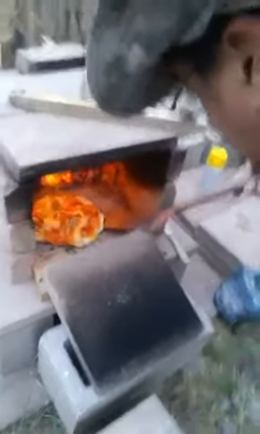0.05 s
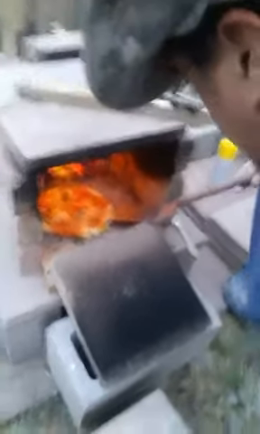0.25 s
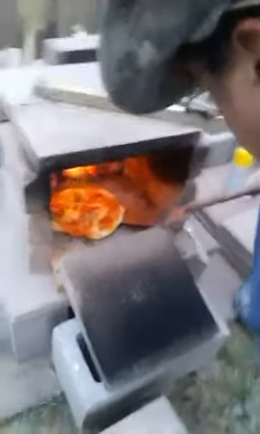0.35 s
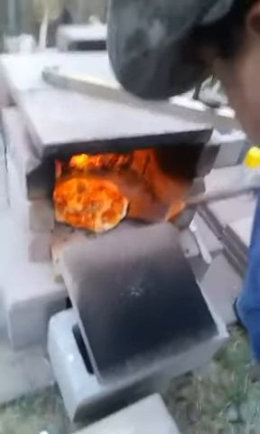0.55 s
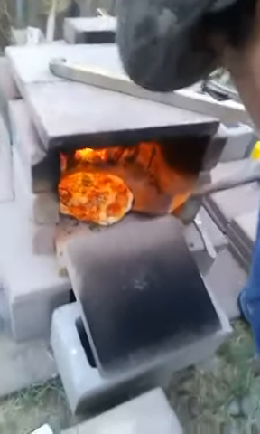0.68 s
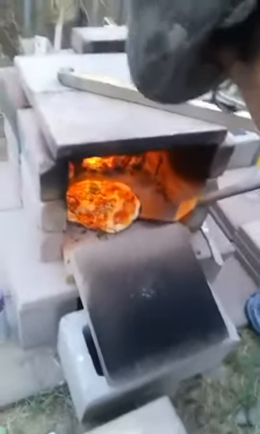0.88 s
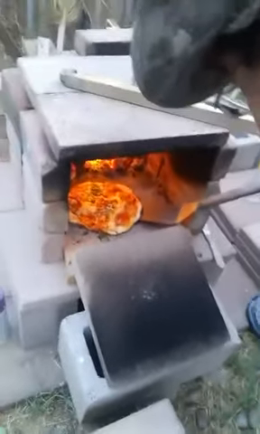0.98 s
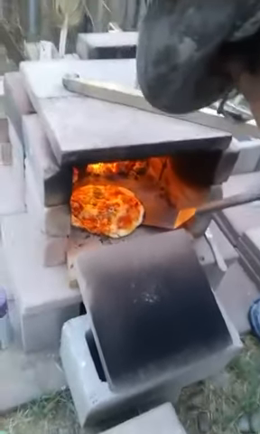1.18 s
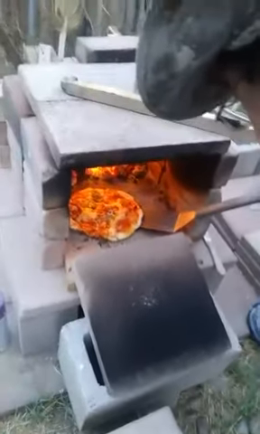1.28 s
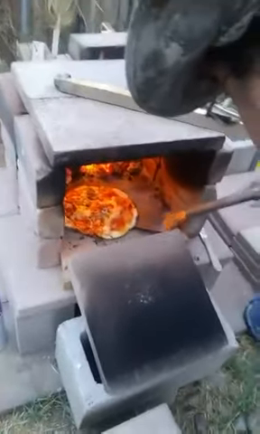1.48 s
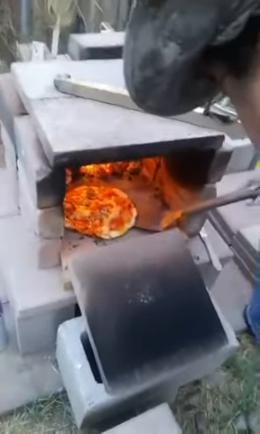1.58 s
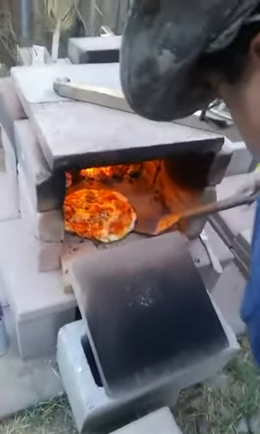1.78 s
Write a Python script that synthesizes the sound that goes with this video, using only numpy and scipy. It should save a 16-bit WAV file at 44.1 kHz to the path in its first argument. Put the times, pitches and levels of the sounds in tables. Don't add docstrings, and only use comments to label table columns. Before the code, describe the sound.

A thin metal peel scrapes in short gritty strokes over a brick oven floor, wind buffeting

```python
import sys
import numpy as np
from scipy import signal
from scipy.fft import rfft, irfft, next_fast_len
from scipy.io import wavfile
from scipy.ndimage import uniform_filter1d

SR = 44100
rng = np.random.default_rng(int(sys.argv[2]) if len(sys.argv) > 2 else 0)


def attenuation_scalar(level_db):
    decades = np.asarray(level_db, float) / 20
    return 10 ** decades


def generate_wav(sig):
    pcm = np.round(np.clip(np.atleast_2d(sig).T, -1, 1) * 32767).astype(np.int16)
    wavfile.write(sys.argv[1], SR, pcm)


N = 81585

# start_s, length_s, start_level_db, end_level_db, handle_weight_db
STROKES = [(0, 0.025, -37.5, -52.5, 4.5), (0.019, 0.087, -48, -55.5, -6), (.091, 0.011, -46, -45, -10),
           (0.103, 0.12, -36, -35.5, -6), (0.183, 0.024, -27.5, -38, 0), (0.225, .025, -40.5, -39.5, 0),
           (0.259, 0.091, -36.5, -29, -11), (0.325, 0.046, -31, -32.5, -16.5),
           (0.377, 0.044, -31, -28, -7.5), (0.423, 0.073, -39.5, -54.5, -1),
           (0.4907, 0.049, -36.5, -30, -11.5), (0.547, 0.1, -36.5, -48, -11), (0.622, 0.024, -33, -37.5, 2),
           (0.646, 0.078, -51.5, -48.5, -6), (0.734, .012, -54, -52, -20),
           (0.749, 0.09, -39.5, -42.5, -14.5), (0.802, 0.032, -32.5, -40.5, -40),
           (0.869, 0.044, -45, -54, -9), (0.901, 0.016, -39, -48, -32), (0.933, 0.015, -48, -38.5, -3),
           (1.037, 0.1, -32, -38, -16.5), (1.104, 0.073, -48.5, -47, -9), (1.264, 0.0092, -38, -60.5, -18),
           (1.299, 0.042, -56.5, -43, -22), (1.442, 0.15, -41.5, -40, -55),
           (1.539, 0.039, -56.5, -37.5, -15), (1.595, 0.033, -33, -40, -15), (1.792, 0.0076, -54, -48, -38),
           (1.805, 0.064, -35.5, -39.5, -19.5)]
# start_s, level_db, handle_weight_db, brightness_db
CATCHES = [(0.193, -30, 16, -6), (0.206, -31, 12.5, -12.5), (0.371, -28.5, -5.5, -8), (0.349, -27, -9, 3),
           (0.493, -31, -29, 5), (.594, -43, -21, 6), (0.407, -37, -0.5, 0), (0.477, -36.5, -25, 5),
           (0.625, -34, 6, 1), (0.712, -43, -40, 11), (0.785, -32.5, -19, 5), (0.526, -35, -21, 1),
           (0.941, -27, -8.5, 11), (0.993, -51.5, 4, -1), (1.053, -33.5, -36, 26), (1.093, -21.5, -25, 5),
           (1.145, -32.5, -16, -15), (1.333, -47, -15, -14), (1.489, -30.5, -40, 5), (1.577, -46, -22, 0),
           (1.608, -27, -26, -2)]
# centre_s, length_s, pitch_hz, level_db
SINGS = [(0.13, 0.02, 12700, -63), (0.181, 0.019, 6830, -32), (0.332, 0.013, 6960, -30),
         (0.377, 0.019, 11670, -31), (0.413, 0.026, 9200, -36), (0.494, 0.024, 13000, -48),
         (0.531, 0.02, 13060, -33), (0.509, 0.08, 7150, -39), (.765, 0.042, 5530, -47),
         (.81, 0.032, 5460, -42.5), (0.908, 0.02, 5520, -48.5), (1.046, 0.012, 5620, -41.5),
         (1.084, 0.027, 12800, -49), (1.336, 0.008, 5480, -40.5), (1.576, 0.021, 7400, -45),
         (1.58, 0.015, 6500, -50)]
# start_s, pitch_hz, peak_db, t60_s
PINGS = [(.001, 1200, -46, 0.2), (.193, 1111, -23.5, 0.1), (0.194, 1340, -34, 0.1),
         (.2, 1650, -28.5, 0.091), (0.413, 1342, -29.5, 0.083), (1.295, 950, -50.5, 0.062),
         (0.406, 1139, -26, 0.068), (0.633, 343, -32, 0.067), (0.943, 1342, -30.5, 0.055),
         (1.148, 1465, -44.5, 0.076), (.63, 926, -40.5, 0.13)]
# time_s, level_db
FLATNESS = [(0, -6.5), (.1, -3), (.65, 2), (.74, -8.5), (.82, -10), (.87, -19), (1.0, -10), (1.05, -0.5),
            (1.3, -3.5), (1.6, -1), (1.85, 5.5)]
# frequency_hz, level_db (per Hz)
GRIT_COLOUR = [(880, -23), (1500, -45), (2340, -16), (4180, -3), (4690, -8), (5770, -1), (9370, -3.5),
               (13300, -6.5), (14500, -26.5)]
BLADE_HZ = [3080, 4270, 4945, 5410, 5940, 6525, 7000, 7400, 8100, 9160, 10300, 11800, 12200, 13000]
BLADE_LEVELS_DB = [8.5, -39, 5.5, 11.5, 10, 9, 10, 1.5, -23, 0, 4, 3.5, -22, -5]
# pitch_hz, level_db, t60_s
HANDLE_MODES = [(880, -44, 0.11), (1170, 11.5, 0.089), (1387, 15.5, 0.032), (1602, 8.5, 0.036),
                (1780, 8, 0.035), (2052, 12.5, 0.012), (2457, 4, 0.069), (2662, 4, 0.059),
                (3208, 14.5, 0.023), (3570, 13, 0.065), (5000, 5, 0.063)]
# centre_s, peak_db, eddy_hz, length_s
BUFFETS = [(0.111, -34.5, 71, 0.059), (0.132, -60, 68, 0.022), (0.212, -21, 79.5, 0.016),
           (0.23, -26, 62, 0.015), (0.396, -25, 64.5, 0.025), (0.418, -14.5, 89.3, 0.026),
           (0.454, -15, 108, 0.01), (0.495, -12, 69, 0.03), (0.549, -16.5, 65.5, 0.048),
           (0.584, -26, 60.7, 0.009), (.628, -19.5, 74, 0.065), (0.692, -12.5, 81, 0.017),
           (.722, -11.5, 106.5, .018), (0.743, -11, 114.3, 0.019), (0.756, -12.5, 63, 0.023),
           (0.774, -10.5, 122.5, 0.016), (0.799, -10.5, 76.6, 0.013), (0.821, -10.5, 95, 0.019),
           (0.84, -8, 98, 0.0095), (.878, -6, 73, 0.025), (.891, -3.5, 144, 0.0046),
           (0.904, -14.5, 63.7, 0.037), (0.968, -22.5, 74, 0.015), (1.057, -24.5, 70, 0.018),
           (1.115, -36, 74, 0.02), (1.196, -25.5, 124, 0.025), (1.208, -25, 74, 0.044),
           (1.307, -38.5, 66, 0.033), (1.666, -39, 56, 0.022), (1.82, -45, 73, 0.022),
           (0.868, -24.5, 242, 0.024), (0.725, -34, 265, 0.0065), (.772, -20.5, 182, 0.013),
           (0.951, -48, 337, 0.035), (0.344, -38.5, 55, 0.02), (1.018, -36.5, 80, 0.016),
           (1.8, -53, 51, 0.017), (0.524, -37, 144, 0.01)]
# frequency_hz, level_db (per Hz)
YARD_COLOUR = [(40, -0.5), (230, -5), (400, -11), (1200, -21), (1900, -30), (4400, -36), (6500, -27),
               (14000, -43)]

ATTACK_S, RELEASE_S, CATCH_S = 0.0028, 0.008, 0.0045
GRAINS_PER_S, GRAIN_DB = 7000, 2.5
CHATTER_DB, CHATTER_HZ, SPARK_DB = -0.5, 90.97, 2.2
FLAT_HZ, SPLIT_HZ = 4770, 8540
WANDER_DB, WANDER_HZ = 3, 25.09
SHEET_T60_S, BLADE_T60_S, SING_T60_S = 0.012, 0.042, 0.035
SHEET_DB, BLADE_DB, DRY_DB, HANDLE_DB = -3.5, -6.5, -6, -4
PING_RISE_S = 0.0014
OVEN_T60_S, OVEN_DB, OVEN_HZ = 0.33, -14, 7400
SKEW, GLIDE = 2.23, 0.26
CREST_DB, CREST_POWER = -8.5, 0.63
SWIRL_DB, SWIRL_HZ, SWIRL_POWER = -17, 160.4, 1.45
EDDY_DB, BREEZE_DB = -11, -49
POP_S, POP_DB, POP_HZ = 0.8895, -9.5, 490
CEILING, PORT_HZ = 0.99, 33.7
YARD_DB, RUMBLE_WANDER_DB, AIR_WANDER_DB = -52, 3, 1.2
TOP_HZ = 13950


def peel(t):
    low, high, handle_force = contact_force(t)
    grains = grit_grains()
    grit = level(colour(grains, GRIT_COLOUR))
    flat = attenuation_scalar(np.interp(t, *np.array(FLATNESS).T))
    edge = blade_edge(grit, low, high, flat)
    wander = [attenuation_scalar(WANDER_DB * walk(WANDER_HZ)) for _ in BLADE_HZ]
    blade = blade_ring(edge, grit, wander) + attenuation_scalar(DRY_DB) * edge
    handle = handle_ring(handle_force * grains, wander, flat)
    handle = handle / np.std(handle_ring(grains, wander, flat))
    return blade + attenuation_scalar(HANDLE_DB) * handle + singing(t, grains) + pings(t) + attenuation_scalar(OVEN_DB) * oven(blade)


def contact_force(t):
    low, high, handle = np.zeros((3, N))
    for start, length, start_db, end_db, weight_db in STROKES:
        u = t - start
        attack = np.clip(u / ATTACK_S + (start == 0), 0, 1)
        release = np.exp(-np.maximum(u - length, 0) / RELEASE_S)
        force = attack * attenuation_scalar(np.interp(u, [0, length], [start_db, end_db])) * release
        low += force ** 2
        high += force ** 2
        handle += (force * attenuation_scalar(weight_db)) ** 2
    for start, db, weight_db, bright_db in CATCHES:
        u = np.maximum(t - start, 0) / CATCH_S
        force = np.sqrt(u) * np.exp(-u ** 2 / 2) * 1.364 * attenuation_scalar(db)
        low += (force * attenuation_scalar(-bright_db / 2)) ** 2
        high += (force * attenuation_scalar(bright_db / 2)) ** 2
        handle += (force * attenuation_scalar(weight_db)) ** 2
    return np.sqrt([low, high, handle])


def grit_grains():
    chance = rng.random((3, N))
    hits = chance[0] < GRAINS_PER_S / SR
    sizes = attenuation_scalar(-GRAIN_DB * np.log(chance[2] + 1e-9))
    grains = hits * np.sign(chance[1] - 0.5) * sizes
    return level(grains * attenuation_scalar(CHATTER_DB * walk(CHATTER_HZ)))


def blade_edge(grit, low, high, flat):
    slow, below = split(grit, FLAT_HZ), split(grit, SPLIT_HZ)
    spark = attenuation_scalar(SPARK_DB * walk(CHATTER_HZ * 1.4))
    return low * (flat * slow + below - slow) + high * spark * (grit - below)


def blade_ring(edge, grit, wander):
    spots = rng.random((90, 2))

    def modes(x):
        sheet, strong = np.zeros((2, N))
        for k, (shift, decay) in enumerate(spots):
            hz = 2900 + 11000 * (k + shift) / len(spots)
            sheet += (-1) ** k * ring(x * wander[k % len(wander)], hz, SHEET_T60_S * (0.68 + decay))
        for hz, db, w in zip(BLADE_HZ, BLADE_LEVELS_DB, wander):
            strong += attenuation_scalar(db) * ring(x * w, hz, BLADE_T60_S)
        return sheet, strong

    sheet, strong = modes(edge)
    steady_sheet, steady_strong = modes(grit)
    return attenuation_scalar(SHEET_DB) * sheet / np.std(steady_sheet) + attenuation_scalar(BLADE_DB) * strong / np.std(steady_strong)


def handle_ring(x, wander, flat):
    out = np.zeros(N)
    for (hz, db, t60), w in zip(HANDLE_MODES, wander[::-1]):
        freedom = flat ** 2 if hz > 1500 else 1
        out += attenuation_scalar(db) * ring(x * w * freedom, hz, t60)
    return cut(out, 940, "high", order=6)


def singing(t, grains):
    out = np.zeros(N)
    for centre, length, hz, db in SINGS:
        swell = np.exp(-(2 * (t - centre) / length) ** 2)
        out += attenuation_scalar(db) * ring(grains * swell, hz, SING_T60_S)
    return out


def pings(t):
    out = np.zeros(N)
    for start, hz, db, t60 in PINGS:
        u = np.maximum(t - start, 0)
        out += attenuation_scalar(db - 60 * u / t60) * (1 - np.exp(-u / PING_RISE_S)) * np.sin(2 * np.pi * hz * u)
    return out


def oven(blade):
    hiss_colour = [(1500, -35), (OVEN_HZ / 2, -14), (5200, -4), (OVEN_HZ, 0), (10500, -5), (14000, -10)]
    hiss = level(colour(rng.standard_normal(N), hiss_colour))
    fade = attenuation_scalar(-120 * np.arange(int(0.6 * SR)) / SR / OVEN_T60_S)
    power = signal.fftconvolve(blade ** 2, fade / fade.sum())[:N]
    return hiss * np.sqrt(np.abs(power))


def wind(t):
    swing, gust = np.zeros((2, N))
    for (centre, db, hz, length), turn in zip(BUFFETS, rng.random(len(BUFFETS))):
        v = t - centre
        u = np.where(v < 0, SKEW, 1) * v / length
        swell = attenuation_scalar(db) * np.exp(-(1.72 * u) ** 2 / 2)
        phase = 2 * np.pi * (hz * v * (1 - GLIDE * np.tanh(u)) + (turn - 0.5) / 10)
        crest = swell * (swell * np.exp(-(v / length) ** 2)) ** CREST_POWER
        swing += swell * np.cos(phase) + attenuation_scalar(CREST_DB) * crest * np.cos(2 * phase)
        gust += swell
    noise = rng.standard_normal((2, N))
    swirl = cut(cut(noise[0], SWIRL_HZ * 1.275, "low", order=6), SWIRL_HZ * 1.13, "high")
    eddies = cut(cut(noise[1], 109.0, "low", order=4), 40, "high")
    push = swing + level(swirl, SWIRL_DB) * gust ** SWIRL_POWER
    push += level(eddies, EDDY_DB) * (uniform_filter1d(gust, 2500) + attenuation_scalar(BREEZE_DB))
    push = CEILING * np.tanh(push / CEILING)
    return split(push, 530) - split(push, PORT_HZ) + cut(wind_pop(t), 160, "high")


def wind_pop(t):
    u = np.maximum(t - POP_S, 0) * POP_HZ
    return attenuation_scalar(POP_DB) * np.e * u * np.exp(-u * 1.8)


def yard():
    air = level(colour(rng.standard_normal(N), YARD_COLOUR), YARD_DB)
    rumble = cut(air, 179, "low") * attenuation_scalar(RUMBLE_WANDER_DB * walk(24.1))
    return rumble + cut(air, 520, "high") * attenuation_scalar(AIR_WANDER_DB * walk(10.52))


def level(x, db=0):
    return x * attenuation_scalar(db) / np.sqrt(np.mean(x ** 2))


def colour(x, table):
    hz, db = np.array(table, float).T
    n = next_fast_len(2 * N)
    f = np.maximum(np.arange(n // 2 + 1) * SR / n, 1)
    gain = attenuation_scalar(np.interp(np.log(f), np.log(hz), db, left=-60))
    return irfft(rfft(x, n) * gain, n)[:N]


def ring(x, hz, t60):
    r = np.exp(-np.log(1000) / (max(t60, 0.002) * SR))
    w = 2 * np.pi * hz / SR
    return signal.lfilter([2 * np.sin(w) * np.sqrt(1 - r)], [1, -2 * r * np.cos(w), r * r], x)


def cut(x, hz, kind, order=2):
    return signal.sosfilt(signal.butter(order, hz, kind, fs=SR, output="sos"), x)


def split(x, hz):
    return signal.sosfiltfilt(signal.butter(4, hz, fs=SR, output="sos"), x)


def walk(rate):
    held = rng.standard_normal(N)[(np.arange(N) * rate / SR).astype(int)]
    return uniform_filter1d(held, max(int(SR / rate / 2), 1))


def scene():
    t = np.arange(N) / SR
    return (peel(t) + wind(t) + yard())[None]


def top_cut(x):
    return signal.sosfilt(signal.butter(12, 14920, fs=SR, output="sos"), x)


def record(dry):
    mix = signal.sosfilt(signal.ellip(12, 0.2, 75, TOP_HZ, fs=SR, output="sos"), dry)
    return top_cut(mix)


dry = scene()
out = record(dry)
generate_wav(out)
```